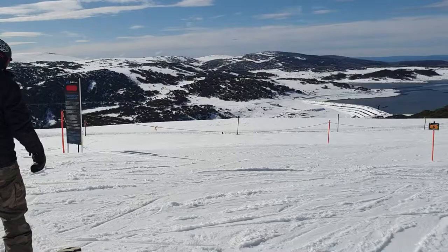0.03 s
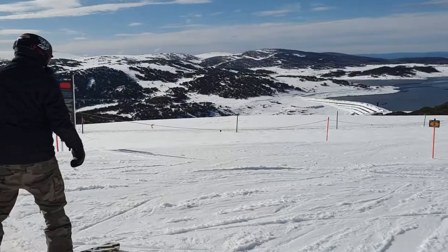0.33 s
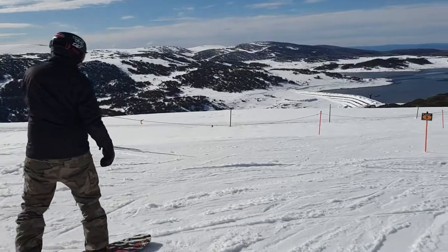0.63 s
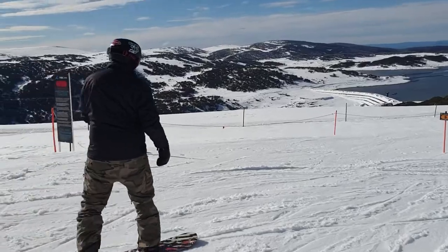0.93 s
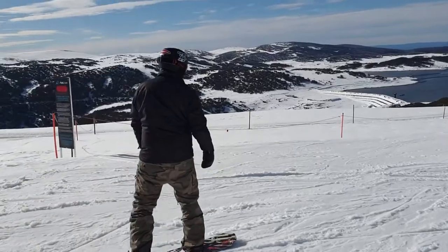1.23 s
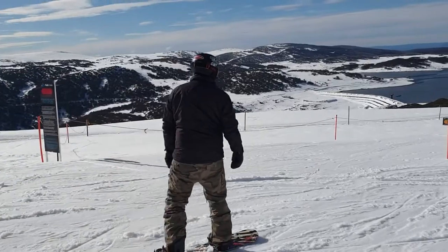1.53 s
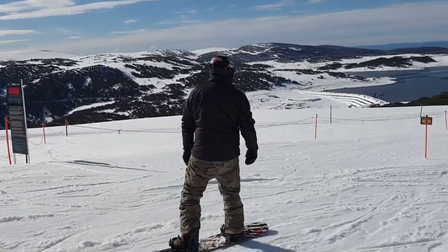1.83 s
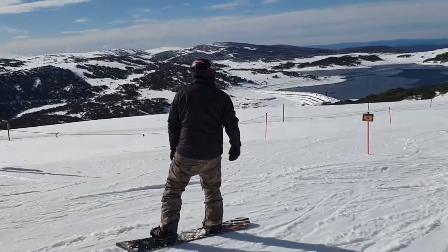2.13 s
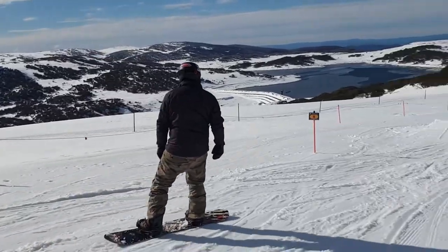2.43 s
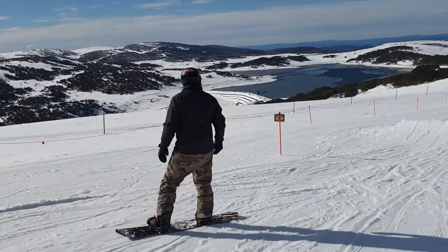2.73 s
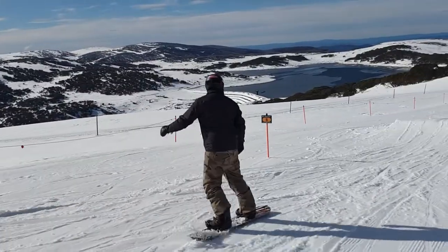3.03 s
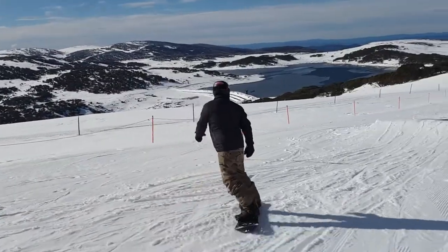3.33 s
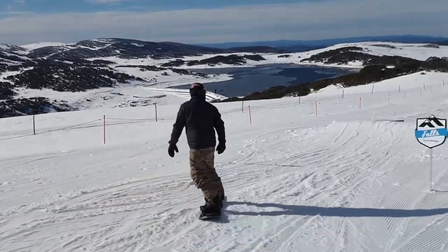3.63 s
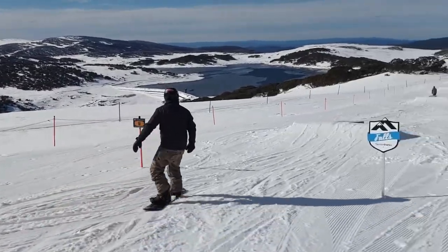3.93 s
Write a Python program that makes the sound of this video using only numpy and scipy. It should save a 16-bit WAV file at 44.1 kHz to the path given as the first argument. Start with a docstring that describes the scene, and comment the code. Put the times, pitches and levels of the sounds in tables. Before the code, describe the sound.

A snowboard approaches over packed snow, crunching and hissing, skids past close on the left, then glides away down the slope. Gusty wind rumbles and flutters on the moving microphone throughout.

```python
"""Wind rumbles in both ports of a moving microphone and flutters and buffets the left one.
A snowboard nears, crushing countless snow grains: a crunch below, a hiss and powder spray above.
From 0.6 s its edge bites in swishes; around 1.3 s it skids past, close on the left.
It then glides away down the packed slope with a few crisp ticks of snapping crust,
while the wind lulls on the left and keeps gusting on the right."""
import sys
import numpy as np
from scipy import signal
from scipy.fft import rfft, irfft
from scipy.io import wavfile
from scipy.ndimage import uniform_filter1d

SR = 44100
rng = np.random.default_rng(int(sys.argv[2]) if len(sys.argv) > 2 else 0)


def master(y):
    """Save y as 16-bit WAV."""
    cut = np.clip(np.atleast_2d(y).T, -1, 1)
    pcm = np.round(cut * 32767)  # scale
    wavfile.write(sys.argv[1], SR, pcm.astype(np.int16))


N = 176400
T = np.arange(N) / SR

# Colour of the scraping snow as heard through the microphone, with a notch at 9 kHz.
# Each row: frequency in Hz, gain in dB.
HEARD_COLOUR = [(150, -43), (230, -15.5), (310, -1.5), (420, -5), (700, -3.5), (1000, -1.5), (1400, 1),
                (2000, 1.5), (2500, -2), (3000, -6.5), (3800, -2), (4800, -1), (5800, -3), (7000, -5.5),
                (8000, -12.5), (9000, -18.5), (10200, -11), (11300, -6.5), (12300, -12), (13500, -20),
                (15500, -19.5)]


def from_db(db):
    """Decibels to gain."""
    return 10 ** (np.asarray(db) / 20)


def unit(x):
    """Scales to rms 1."""
    return x / np.sqrt(np.mean(x ** 2) + 1e-20)


def curve(points):
    """Interpolates (s, value) rows at every sample."""
    return np.interp(T, *np.transpose(points))


def colour(x, points):
    """Filters by (Hz, dB) rows."""
    hz, db = np.transpose(points)
    bins_hz = np.fft.rfftfreq(N, 1 / SR)
    return irfft(rfft(x) * from_db(np.interp(np.log(bins_hz + 1), np.log(hz), db)), N)


def band(x, low_hz, high_hz, order=24):
    """Band-pass with smooth edges."""
    hz = np.fft.rfftfreq(N, 1 / SR) + 1
    return irfft(rfft(x) / ((1 + (low_hz / hz) ** order) * (1 + (hz / high_hz) ** order)), N)


def resonate(x, hz, width_hz, order=2):
    """Unity-gain band that follows the curve hz."""
    carrier = np.exp(2j * np.pi * np.cumsum(hz) / SR)
    lowpass = signal.butter(order, width_hz / 2, fs=SR)
    return 2 * (carrier * signal.lfilter(*lowpass, x / carrier)).real


def wobble(rate_hz):
    """Smooth random motion of rms 1, up to rate_hz."""
    return unit(band(rng.standard_normal(N), rate_hz / 10, rate_hz, order=3))


def turbulence(spectrum, lumpy_db, lump_hz, steady_s):
    """Lumpy pressure noise, its rms held near 1 over steady_s."""
    lumps = rng.standard_normal(N) * from_db(lumpy_db * wobble(lump_hz))
    pressure = band(colour(lumps, spectrum), 1, spectrum[-1][0], order=4)
    width = int(steady_s * SR)
    power = uniform_filter1d(uniform_filter1d(pressure ** 2, width), width)
    return pressure / np.sqrt(power + 1e-20)


def eddy_envelope(eddies):
    """Short bell-shaped gusts, summed in power."""
    return np.sqrt(sum((from_db(db) * np.exp(-.5 * ((T - peak_s) / sigma_s) ** 2)) ** 2
                       for peak_s, sigma_s, db in eddies))


def wind_right():
    """The sheltered port rumbles and catches a few dull puffs."""
    # Wind strength. Each row: time in s, rumble level in dB.
    wind = [(0.12, -39.5), (0.28, -31), (0.56, -39.5), (0.76, -32.5), (0.83, -37), (0.92, -25.5),
            (1.04, -33.5), (1.2, -29), (1.3, -35.5), (1.75, -41), (1.94, -28.5), (2.08, -41.5), (2.25, -46),
            (2.35, -31), (2.5, -46), (2.62, -39), (2.82, -50.5), (3.06, -50.5), (3.18, -37.5), (3.28, -49),
            (3.35, -35), (3.41, -44.2), (3.5, -31), (3.72, -42.5), (3.9, -36.5), (4.0, -46.2)]
    # Wind colours. Each row: frequency in Hz, gain in dB.
    rumble_colour = [(15, -25), (25, -27), (38, -2), (65, 2), (90, -3), (130, -9), (200, -21), (280, -28),
                     (450, -43), (1200, -59)]
    puff_colour = [(60, -6), (140, 10), (260, -8), (400, -16), (700, -31), (2000, -60)]
    # Soft eddies. Each row: peak time in s, Gaussian sigma in s, level in dB.
    eddies = [(.138, 0.0078, -37.5), (.215, .01, -38), (.47, .006, -41), (.975, 0.01, -39),
              (2.168, 0.0033, -37), (3.5, 0.013, -40)]
    rumble = turbulence(rumble_colour, lumpy_db=4.5, lump_hz=41, steady_s=0.036)
    puff = turbulence(puff_colour, lumpy_db=-4, lump_hz=60, steady_s=0.005)
    return from_db(curve(wind)) * rumble + eddy_envelope(eddies) * puff


def wind_left():
    """Rumble, a sputtering flutter that grows with the wind, and the thud of each eddy."""
    # Wind strength. Each row: time in s, rumble level in dB.
    wind = [(0.12, -32.5), (0.28, -33), (0.58, -37), (0.86, -33.5), (1.2, -36), (1.28, -33.5), (1.48, -37),
            (1.8, -58), (1.88, -59), (1.94, -38), (2.02, -52), (2.16, -58), (2.36, -36.5), (2.5, -41.5),
            (2.68, -43), (3.06, -52), (3.3, -72), (3.76, -71.8), (3.85, -47), (4.0, -46)]
    # Wind colours. Each row: frequency in Hz, gain in dB.
    rumble_colour = [(15, -26), (25, -17), (38, -10.5), (60, -3), (90, -5), (135, -6), (200, -13),
                     (350, -22), (800, -57)]
    flutter_colour = [(80, 1), (170, -2), (260, -1), (370, 1.5), (540, -5.5), (700, -11), (950, -16),
                      (2000, -36), (5000, -71)]
    buffet_colour = [(80, -10), (170, -5), (260, 0), (380, 1), (540, -2), (680, -12), (950, -20.5),
                     (2000, -43), (5000, -59)]
    # Eddies that hit the port. Each row: peak time in s, Gaussian sigma in s, level in dB.
    eddies = [(.136, 0.0061, -35), (.285, 0.021, -32), (0.55, 0.02, -32), (0.663, 0.02, -32.5),
              (.87, 0.038, -32), (1.266, 0.014, -24), (1.299, 0.0092, -21.5), (1.345, 0.033, -31),
              (2.294, 0.018, -36.5), (2.345, .008, -37.5), (2.386, 0.0075, -26.5), (2.576, 0.011, -36.5),
              (3.827, 0.0061, -38)]
    brisk_db, flutter_offset_db, flutter_db_per_db = -36.5, -3, 1.28
    wind_db = curve(wind)
    flutter_db = brisk_db + flutter_offset_db + flutter_db_per_db * (wind_db - brisk_db)
    rumble = turbulence(rumble_colour, lumpy_db=5.5, lump_hz=40, steady_s=0.091)
    flutter = turbulence(flutter_colour, lumpy_db=4.0, lump_hz=80, steady_s=0.04)
    buffet = turbulence(buffet_colour, lumpy_db=3.5, lump_hz=120, steady_s=0.016)
    return from_db(wind_db) * rumble + from_db(flutter_db) * flutter + eddy_envelope(eddies) * buffet


def crushing_snow():
    """A wash of tiny snow grains with sparser large ones, its colour shifting in patches."""
    grains_per_s, spread_db, grain_share, patchy_db = 2500, 2.5, 0.23, 1.31
    sizes = from_db(spread_db * np.minimum(rng.exponential(1, N), 5))
    grains = sizes * rng.choice([-1, 1], N) * (rng.random(N) < grains_per_s / SR)
    wash = np.sqrt(grain_share) * unit(grains) + np.sqrt(1 - grain_share) * rng.standard_normal(N)
    spectra = signal.stft(wash, nperseg=1024, noverlap=768)[2]
    patches = uniform_filter1d(rng.standard_normal(spectra.shape), size=10, axis=0)
    patches = unit(uniform_filter1d(patches, size=14, axis=1))
    patchy = signal.istft(spectra * from_db(patchy_db * patches), nperseg=1024, noverlap=768)[1]
    return colour(patchy[:N], HEARD_COLOUR)


def crust_ticks(decay_s=0.015):
    """Crumbs of crust snap under the edge in bright, decaying bursts."""
    # Snaps. Each row: start in s, level in dB.
    snaps = [(.468, -40.5), (2.37, -36.5), (2.955, -44)]
    envelope = sum(from_db(db) * (T >= start_s) * np.exp(-abs(T - start_s) / decay_s)
                   for start_s, db in snaps)
    noise = colour(rng.standard_normal(N), HEARD_COLOUR)
    return envelope * unit(band(noise, low_hz=5300, high_hz=12000))


def edge_swishes():
    """Each bite of the edge is an arched burst of grains around a gliding resonance."""
    # Bites. Each row: start and length in s, first centre, last centre and width in Hz, level in dB.
    bites = [(.575, 0.12, 11800, 11900, 7000, -42.5), (0.578, .11, 5100, 5000, 2200, -43.5),
             (0.593, 0.144, 1510, 1470, 800, -41), (0.759, .15, 3950, 3950, 1300, -37),
             (0.916, 0.3, 4400, 5130, 1200, -37.5), (1.096, .22, 10500, 11000, 1900, -32.5),
             (1.646, 0.23, 1680, 2040, 1230, -36.5), (1.924, .11, 1250, 1150, 500, -38),
             (1.953, 0.19, 1950, 1800, 597, -39.5), (2.115, 0.23, 5930, 5900, 1500, -43.5),
             (2.476, 0.13, 5600, 5900, 1100, -41.5), (2.844, .12, 5830, 5700, 900, -47),
             (3.138, 0.25, 1700, 1750, 1100, -47)]
    snow, swishes = crushing_snow(), np.zeros(N)
    for start_s, length_s, first_hz, last_hz, width_hz, db in bites:
        inside = (T >= start_s) & (T < start_s + length_s)
        progress = (T[inside] - start_s) / length_s
        ring = resonate(snow[inside], first_hz + (last_hz - first_hz) * progress, width_hz)
        arch = abs(np.sin(np.pi * progress)) ** 0.45
        swishes[inside] += from_db(db) * unit(ring) * arch
    return swishes


def sliding(dip_depth):
    """Crunch, hiss, spray and fizz swell as the board passes; swishes and ticks ride on top."""
    # Packed snow under the base, edge hiss, powder spray. Each row: time in s, level in dB.
    crunch = [(.12, -48.5), (.57, -49), (.66, -50), (.77, -41.5), (.98, -37.5), (1.28, -36), (1.7, -35),
              (2.08, -36.5), (2.33, -42.5), (2.6, -39.5), (2.92, -43), (3.25, -43), (3.68, -45),
              (4.0, -44.5)]
    hiss = [(.12, -50.5), (.56, -45.5), (.74, -44.5), (.9, -38), (1.15, -34.5), (1.28, -31), (1.4, -32.5),
            (1.54, -31.5), (1.9, -38), (2.06, -35.5), (2.33, -44), (2.55, -41), (2.78, -41.5), (3.2, -41.5),
            (3.62, -47), (4.0, -45)]
    spray = [(.12, -53.5), (.56, -50), (.76, -50.5), (.86, -46.5), (1.08, -44), (1.27, -38), (1.39, -38.5),
             (1.52, -33.5), (1.66, -43.5), (1.92, -47), (2.08, -42.5), (2.33, -50), (2.54, -41.5),
             (2.85, -49), (4.0, -51.5)]
    # Spectral dip: sinks as the board nears, climbs as it leaves. Each row: time in s, centre in Hz.
    dip = [(.1, 6700), (.45, 6340), (.75, 2550), (1.2, 3070), (1.6, 3670), (2.05, 4500), (2.6, 4260),
           (3.05, 3540), (3.55, 6100), (4.0, 5900)]
    firm_crunch_db, fizz_offset_db, fizz_db_per_db = -47, -14, 0.96
    snow = crushing_snow()
    snow = snow - dip_depth * resonate(snow, curve(dip), width_hz=1530, order=1)
    crunch_db = curve(crunch)
    fizz_db = firm_crunch_db + fizz_offset_db + fizz_db_per_db * (crunch_db - firm_crunch_db)
    layers = [(180, 2700, crunch_db), (2700, 8500, curve(hiss)),
              (8500, 13000, curve(spray)), (13000, 17000, fizz_db)]
    glide = sum(unit(band(snow, low_hz, high_hz)) * from_db(db) for low_hz, high_hz, db in layers)
    return glide + edge_swishes() + crust_ticks()


def snowboard():
    """The slide chatters over ridges; it reaches the right port later, shadowed and partly scattered."""
    # The right port faces away from the board. Each row: frequency in Hz, gain in dB.
    shadow = [(400, -10), (1000, -19.5), (1400, -23), (2000, -22.5), (3000, -17.5), (3800, -24.5),
              (5800, -30), (7500, -25.5), (8400, -20), (9000, -6), (10200, -20.5), (11300, -23),
              (13500, -22), (15500, -24)]
    # Its changing exposure as the board passes. Each row: time in s, added gain in dB.
    exposure = [(.1, -2), (.6, -2.5), (1.1, 4.5), (1.5, 2), (1.9, -.5), (2.5, -.5), (3.1, 1), (4.0, -1.5)]
    coherence, delay_s, chatter_db = 0.42, 0.00027, 0.65
    direct, scattered = sliding(dip_depth=0.36), sliding(dip_depth=0)
    right = coherence * np.roll(direct, round(delay_s * SR)) + np.sqrt(1 - coherence ** 2) * scattered
    right = colour(right, shadow) * from_db(curve(exposure))
    return np.array([direct, right]) * from_db(chatter_db * wobble(rate_hz=12))


def scene():
    """The board and the wind at both ports."""
    return snowboard() + np.array([wind_left(), wind_right()])


def record(dry):
    """Low cut, short fade-in, band limit."""
    low_cut_hz, high_cut_hz = 32, 15780
    fade_start_s, fade_s = 0.071, 0.064
    highpass = signal.butter(3, low_cut_hz, "highpass", fs=SR, output="sos")
    fade = np.clip((T - fade_start_s) / fade_s, 0, 1) ** 1.04
    lowpass = signal.firwin(801, high_cut_hz, window=("kaiser", 9), fs=SR)
    return signal.oaconvolve(signal.sosfilt(highpass, dry) * fade, lowpass[None], "same")


dry = scene()
out = record(dry)
master(out)
```